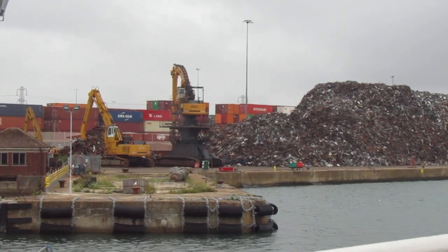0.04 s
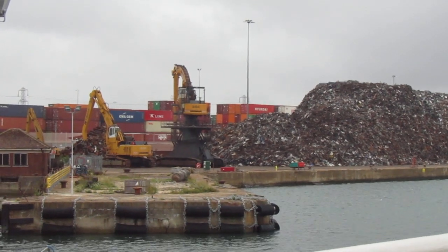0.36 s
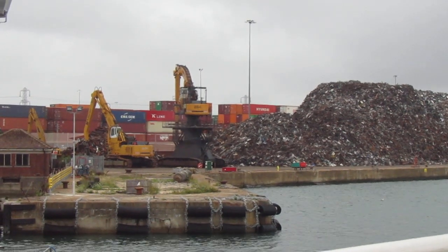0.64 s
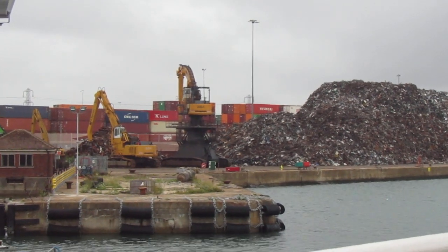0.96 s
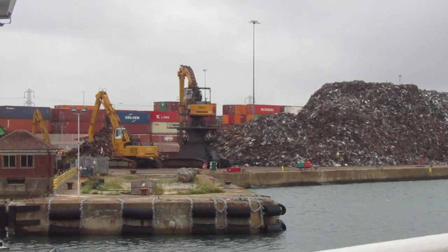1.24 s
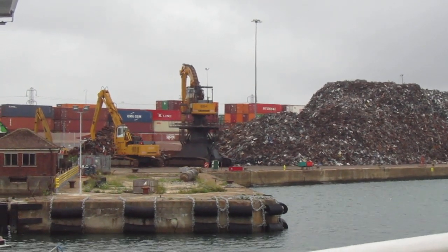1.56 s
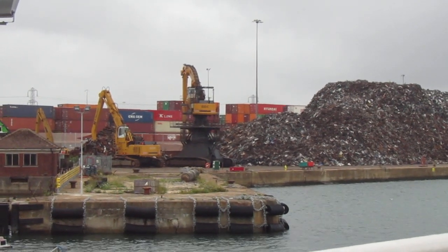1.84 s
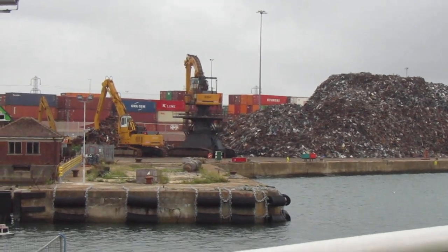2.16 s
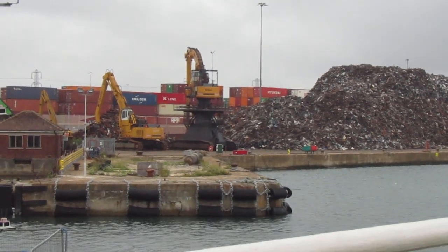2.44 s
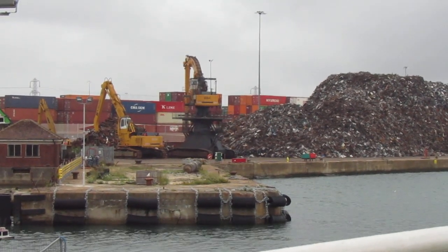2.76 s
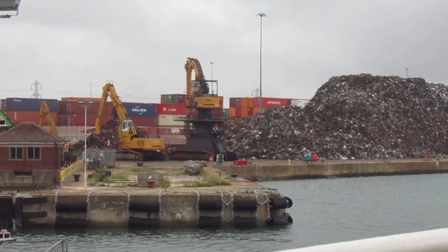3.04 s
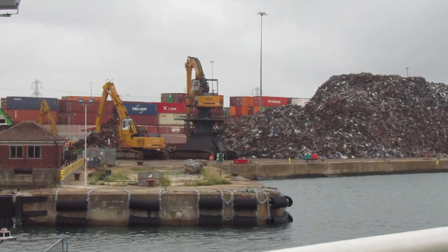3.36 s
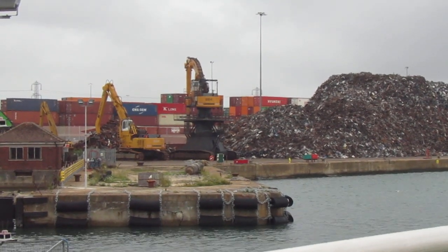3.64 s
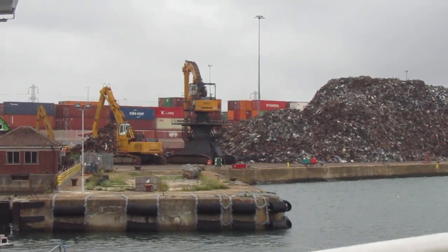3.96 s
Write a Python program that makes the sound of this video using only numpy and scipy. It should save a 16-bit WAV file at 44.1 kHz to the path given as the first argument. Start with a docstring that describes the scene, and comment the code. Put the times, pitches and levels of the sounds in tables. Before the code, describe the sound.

A ship's steam siren blasts loudly, a deep rough tone wrapped in rushing steam. It stops abruptly after about two seconds with a faint echo across the dock, leaving quiet machinery humming, rumbling and hissing.

```python
"""Steam siren over a dock

A ship's siren roars: a jet of steam drives a pipe, making a deep tone near 101 Hz, rough overtones
and a loud rush. A faint echo comes back across the dock. The valve shuts, the low tones ring on
briefly, and the ship's machinery is left humming, rumbling and hissing while an automatic volume
control slowly turns the sound back up."""
import sys
import numpy as np
from scipy import signal
from scipy.fft import rfft, irfft
from scipy.io import wavfile
from scipy.ndimage import uniform_filter1d, minimum_filter1d

SR = 44100
rng = np.random.default_rng(int(sys.argv[2]) if len(sys.argv) > 2 else 0)


def bounce(signal):
    """Save signal as a 16-bit WAV file at the path given by the first command-line argument."""
    frames = np.transpose(np.atleast_2d(signal))
    limited = np.clip(frames, -1, 1)
    pcm = np.round(limited * 32767).astype(np.int16)
    wavfile.write(sys.argv[1], SR, pcm)


N = 176400

# pitch of the pipe (t/s, f/Hz)
PIPE_PITCH = [(0.03, 100.8), (0.15, 100.8), (0.271, 100.3), (0.35, 101.5), (0.48, 101.1), (0.62, 99.86),
              (0.74, 99.5), (0.86, 100.4), (0.96, 101.7), (1.06, 101.3), (1.2, 102.4), (1.35, 101.7),
              (1.48, 101.7), (1.62, 102.6), (1.82, 102.0)]
# strength of the clean tones at 1, 2, 3 and 4 times that pitch (t/s, relative level/dB)
FIRST_TONE = [(0.0, -24.5), (0.16, -12.5), (0.38, -20.5), (0.76, -15), (0.92, -18), (0.98, -26),
              (1.14, -20), (1.21, -27.5), (1.43, -30), (1.47, -27), (1.52, -27), (1.54, -43), (1.62, -25),
              (1.67, -29), (1.7, -37), (1.76, -22), (1.82, -20), (1.97, -31.5), (2.03, -60), (2.07, -60)]
SECOND_TONE = [(0.0, -28), (0.092, -44), (0.244, -32), (0.434, -48), (0.63, -29.5), (0.906, -26.5),
               (0.96, -40), (1.184, -28), (1.678, -28.5), (1.95, -53)]
THIRD_TONE = [(0.0, -15), (0.07, -25), (0.1, -33), (0.17, -19.5), (0.28, -20.5), (0.35, -42), (0.38, -27.5),
              (0.47, -19), (0.55, -41), (0.63, -18.5), (0.83, -16.5), (0.95, -23), (1.11, -14.5),
              (1.55, -15), (1.6, -23.5), (1.86, -20.5), (1.92, -30.5), (1.94, -53), (2.01, -36),
              (2.05, -58)]
FOURTH_TONE = [(0.0, -27.5), (0.426, -36), (0.534, -24.5), (0.654, -33), (0.926, -26), (0.978, -42),
               (1.096, -30.5), (1.41, -48), (1.478, -25), (1.53, -47), (1.596, -25), (1.85, -45)]
# strength shared by all the rough overtones (t/s, relative level/dB)
ROUGH_LEVEL = [(0.0, -27), (0.194, -24.5), (0.232, -27), (0.296, -23.5), (0.332, -36), (0.358, -26),
               (0.692, -28.5), (1.206, -22.5), (1.332, -27), (1.37, -22.5), (1.65, -22.5), (1.772, -34),
               (1.846, -29.5), (1.9, -49)]
# each rough overtone (multiple of the pitch, early relative level/dB, late relative level/dB)
ROUGH_OVERTONES = [(5,-4.5,-3.5),(6,-3.5,-5.5),(7,-3.5,-11.5),(8,-14,-14),(9,-4,-5),(10,-10,-16),(11,-6.5,-3.5),(12,-10,-7),(13,-5.5,-5),(14,-15,-11.5),(15,-13,-14),(16,-14,-16),(17,-17,-18)]
# strength of the rushing steam (t/s, relative hiss level/dB, relative roar level/dB)
STEAM_FLOW = [(0.02, -28.5, -22.5), (0.264, -29.5, -24), (0.342, -28.5, -24), (0.676, -30, -22.5),
              (0.738, -30, -22.5), (1.086, -25.5, -21), (1.686, -28.5, -24), (1.79, -32.5, -30.5),
              (1.842, -36.5, -34), (1.89, -42.5, -39)]
# tone colour of the steam's high hiss and of its lower roar (f/Hz, relative level/dB)
HISS_COLOUR = [(1200,-15),(2000,3),(2600,2.5),(3200,0),(4000,-1),(5000,-4),(7400,-3.5),(8500,-6.5),(10500,-8),(12000,-12),(13500,-17.5),(15000,-24)]
ROAR_COLOUR = [(60,-24),(160,-14.5),(250,-5.5),(335,4.5),(385,-4.5),(470,-5),(570,1),(800,-3.5),(950,-2.5),(1300,-3.5),(1700,-7),(2100,-13),(3000,-30)]
# breathy bands where the jet resonates (f/Hz, width/Hz, early relative level/dB, late relative level/dB)
JET_RESONANCES = [(2680,270,-7,-10),(3920,350,-14.5,-11),(4580,400,-13.5,-21)]
# hum of shafts and fans (f/Hz, level/dB, unsteadiness from 0 to 1)
HUM_TONES = [(50,-33.5,0.1),(99.8,-30,0.19),(110.3,-43,0.4),(150.1,-37,0.26),(202.4,-41,0.8),(226,-40.5,0.2),(249.8,-34.5,0.27),(301.4,-34.5,0.12),(430.6,-42.5,0.6),(607,-43,0.5)]
# tone colour of the machinery and dock noise (f/Hz, relative level/dB)
DOCK_COLOUR = [(25,-24),(70,-5),(120,-1.5),(175,-6.5),(270,-0.5),(350,-4.5),(440,-0.5),(530,-3.5),(650,-4.5),(800,-7.5),(1100,-9.5),(1500,-13.5),(2100,-17),(3000,-23.5),(5000,-27),(7400,-29.5),(8500,-32),(10500,-34),(12500,-40.5),(15000,-49)]

SIREN_GAIN_DB, FADE_DB_PER_S = 10, 117
SETTLE_SPAN_S = (0.94, 1.04)   # between "early" and "late" in the tables


def from_db(db):
    """Turn decibels into a number to multiply a sound by."""
    return 10 ** (np.asarray(db) / 20)


def unit_power(x):
    """Scale a signal so that its average power is 1."""
    return x / np.sqrt(np.mean(x ** 2) + 1e-20)


def seconds():
    """The time of every sample."""
    return np.arange(N) / SR


def gain_curves(rows):
    """One gain curve for each level column of a table, dying away after the last row."""
    times, *columns = np.transpose(rows)
    fade_db = FADE_DB_PER_S * np.maximum(seconds() - times[-1], 0)
    return [from_db(np.interp(seconds(), times, db) - fade_db) for db in columns]


def drift(rate_hz):
    """A smooth random wander of typical size 1; a higher rate wanders faster."""
    step, warm_up = 40, 2000   # samples per random value; values dropped while the smoothing starts
    memory = np.exp(-2 * np.pi * rate_hz * step / SR)
    draws = rng.standard_normal(N // step + warm_up + 2)
    smooth = signal.lfilter([1], [1, -2 * memory, memory ** 2], draws)[warm_up:]
    return np.interp(np.arange(N) / step, np.arange(len(smooth)), unit_power(smooth))


def noise(colour):
    """Noise of power 1, shaped by a tone colour table."""
    hz, db = np.transpose(colour)
    all_hz = np.maximum(np.arange(N // 2 + 1) * SR / N, 1)
    gain = from_db(np.interp(np.log(all_hz), np.log(hz), db))
    gain /= 1 + (all_hz / hz[-1] / 2) ** 4   # fade out above the table's top
    return unit_power(irfft(rfft(rng.standard_normal(N)) * gain, N))


def wavering_tone(phase, unsteadiness, rate_hz):
    """A tone of power 1 whose strength and timing wander at random."""
    phase = phase + rng.uniform(0, 2 * np.pi)
    tone = (1 + unsteadiness * drift(rate_hz)) * np.sin(phase)
    wobble = unsteadiness * drift(rate_hz) * np.cos(phase)
    return unit_power(tone + wobble)


def settling(early_db, late_db):
    """A gain that shifts as the pipe settles on its slightly higher pitch."""
    return from_db(np.interp(seconds(), SETTLE_SPAN_S, [early_db, late_db]))


def pipe(phase):
    """The pipe sounds four clean low tones and a row of overtones roughened by the swirling jet."""
    sound = 0
    for multiple, rows in enumerate((FIRST_TONE, SECOND_TONE, THIRD_TONE, FOURTH_TONE), 1):
        tone = np.sqrt(2) * np.sin(multiple * phase + rng.uniform(0, 2 * np.pi))
        sound += gain_curves(rows)[0] * tone
    rough_gain = gain_curves(ROUGH_LEVEL)[0] * from_db(-3)
    for multiple, early_db, late_db in ROUGH_OVERTONES:
        overtone = wavering_tone(multiple * phase, unsteadiness=0.58, rate_hz=15)
        sound += rough_gain * settling(early_db, late_db) * overtone
    return sound


def jet_hiss():
    """The jet makes a broad hiss and resonates in a few breathy bands."""
    hiss = from_db(0.85) * noise(HISS_COLOUR)
    for hz, width_hz, early_db, late_db in JET_RESONANCES:
        band = signal.lfilter(*signal.iirpeak(hz, hz / width_hz, fs=SR), noise(HISS_COLOUR))
        hiss += settling(early_db, late_db) * unit_power(band)
    return hiss


def steam(phase, puff_depth=0.049, flicker_db=0.25):
    """Rushing steam hisses and roars, puffing a little with each cycle of the pipe."""
    hiss_gain, roar_gain = gain_curves(STEAM_FLOW)
    hiss = hiss_gain * jet_hiss()
    roar = roar_gain * from_db(-0.46) * noise(ROAR_COLOUR)
    puffs = 1 + puff_depth * np.sin(phase)
    flicker = from_db(flicker_db * drift(rate_hz=60))
    return (hiss + roar) * puffs * flicker


def siren(jitter_hz=0.2):
    """The steam jet drives the pipe, whose pitch trembles slightly."""
    hz = np.interp(seconds(), *np.transpose(PIPE_PITCH)) + jitter_hz * drift(rate_hz=36)
    phase = 2 * np.pi * np.cumsum(hz) / SR
    return from_db(SIREN_GAIN_DB) * (steam(phase) + pipe(phase))


def echo(blast, delay_s=0.33, gain_db=-27, cutoff_hz=6000):
    """The blast bounces back once from across the dock, faint and dull."""
    # the siren is already sounding at the start, so the wait is filled with its sound too
    delayed = np.pad(blast, (int(delay_s * SR), 0), mode="reflect")[:N]
    soften_treble = signal.butter(1, cutoff_hz, fs=SR, output="sos")
    return from_db(gain_db) * signal.sosfilt(soften_treble, delayed)


def machinery(noise_db=-27.5, flutter_db=1.06):
    """Shafts and fans hum under a fluttering rumble and hiss."""
    hum = 0
    for hz, db, unsteadiness in HUM_TONES:
        hum += from_db(db) * wavering_tone(2 * np.pi * hz * seconds(), unsteadiness, rate_hz=8)
    noise_gain = from_db(noise_db + flutter_db * drift(rate_hz=19))
    return hum + noise_gain * noise(DOCK_COLOUR)


def scene():
    """The siren, its echo and the machinery, in one channel."""
    blast = siren()
    return (blast + echo(blast) + machinery())[None]


def volume_control(sound, limit_db=-11.5, hold_s=0.5, recovery_db_per_s=3.5):
    """Loud sound turns the volume down; it stays there a moment, then creeps back up."""
    power = uniform_filter1d(sound ** 2, size=SR // 10)
    excess_db = np.maximum(10 * np.log10(power + 1e-12) - limit_db, 0)
    excess_db[0] = excess_db[:SR // 2].max()   # already turned down by the blast at the start
    half_hold = int(hold_s * SR / 2)
    # the biggest excess during the last hold_s seconds
    held_db = -minimum_filter1d(-excess_db, 2 * half_hold + 1, origin=half_hold, mode="nearest")
    recovery_db = recovery_db_per_s * seconds()
    cut_db = np.maximum.accumulate(held_db + recovery_db) - recovery_db
    return sound * from_db(-cut_db)


def record(dry, notch_hz=7930, cutoff_hz=15000):
    """Apply the volume control, then remove one thin slice of treble and the very highest sounds."""
    sound = volume_control(dry[0])
    sound = signal.lfilter(*signal.iirnotch(notch_hz, Q=28, fs=SR), sound)
    top_cut = signal.ellip(12, 0.1, 90, cutoff_hz, fs=SR, output="sos")
    return signal.sosfilt(top_cut, sound)[None]


dry = scene()
out = record(dry)
bounce(out)
```